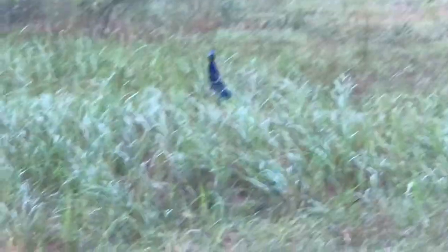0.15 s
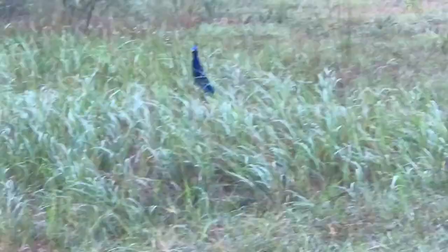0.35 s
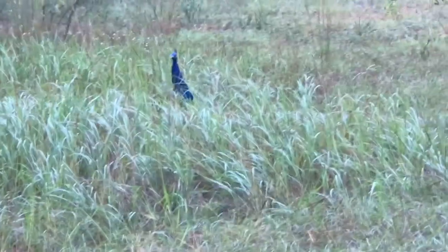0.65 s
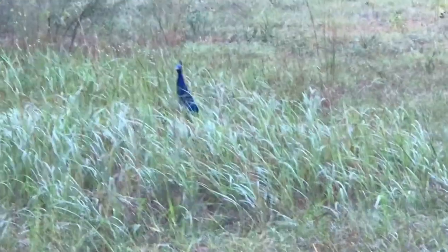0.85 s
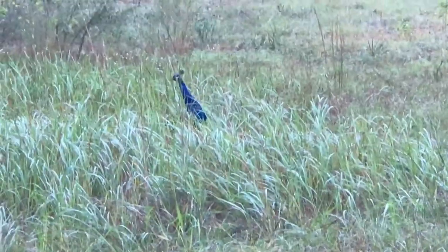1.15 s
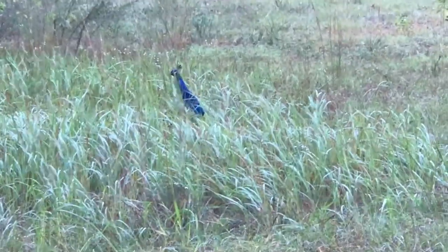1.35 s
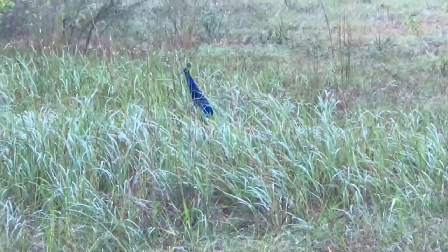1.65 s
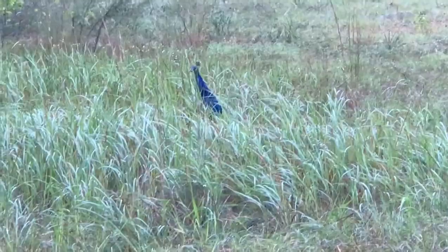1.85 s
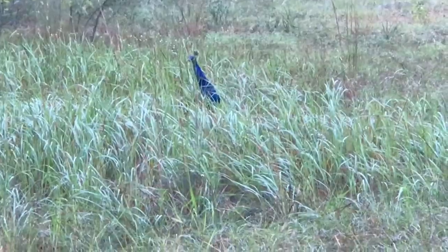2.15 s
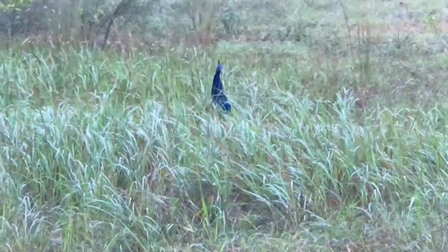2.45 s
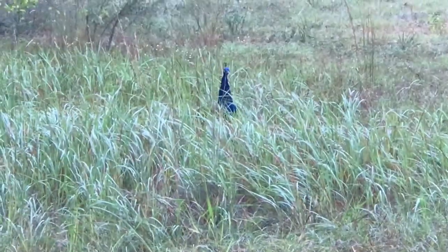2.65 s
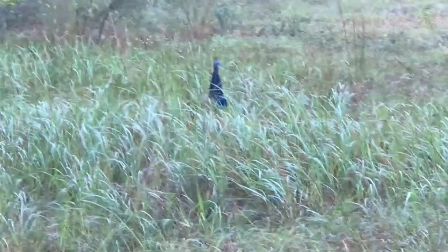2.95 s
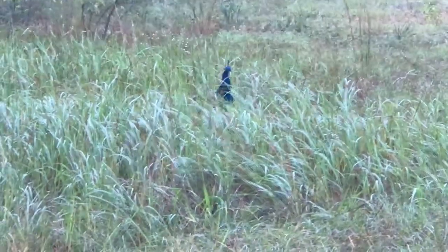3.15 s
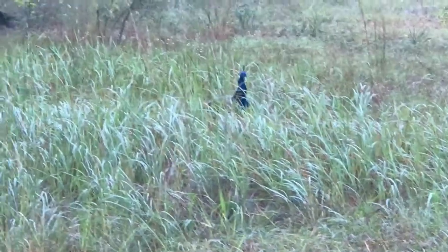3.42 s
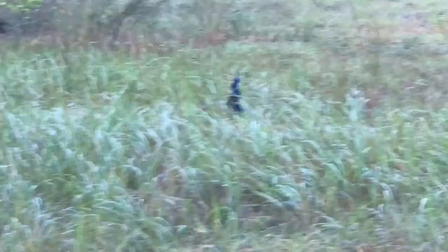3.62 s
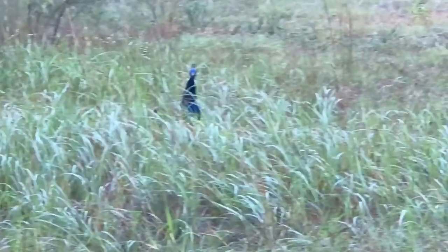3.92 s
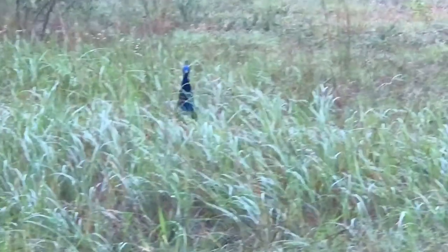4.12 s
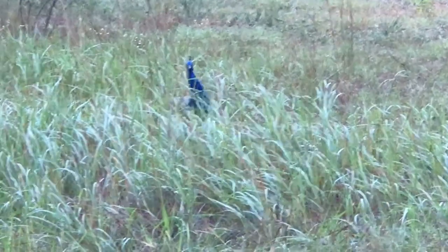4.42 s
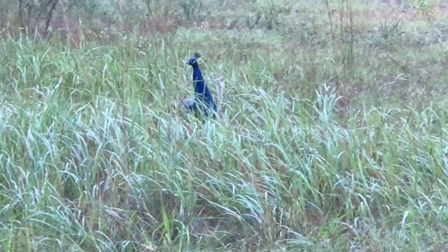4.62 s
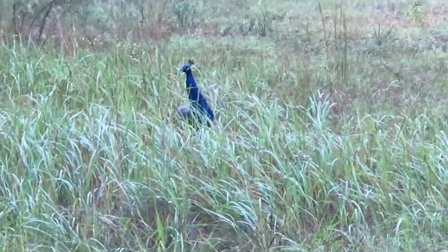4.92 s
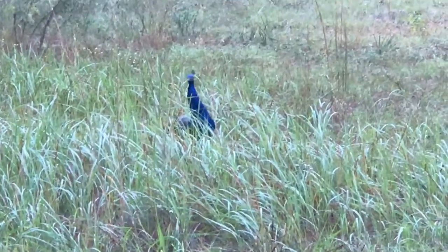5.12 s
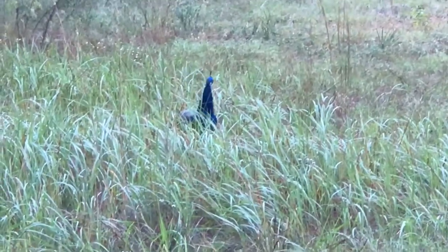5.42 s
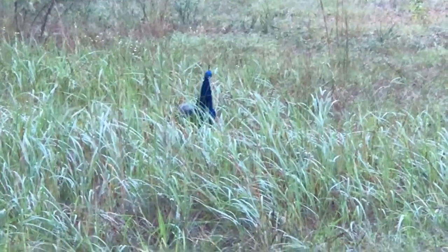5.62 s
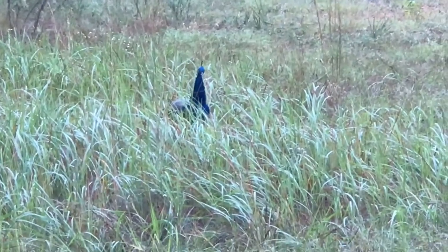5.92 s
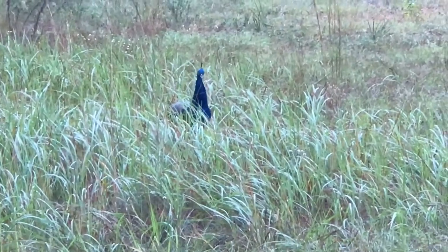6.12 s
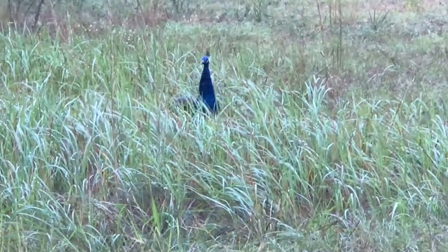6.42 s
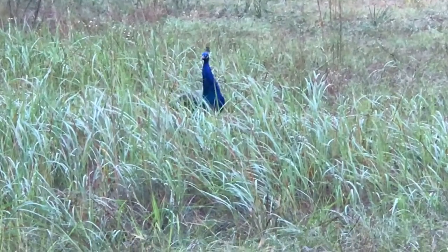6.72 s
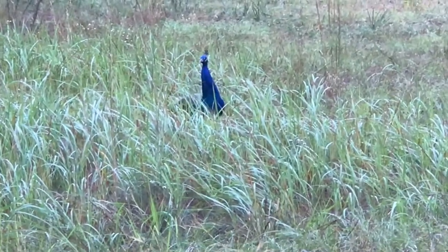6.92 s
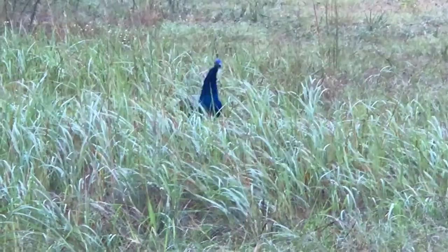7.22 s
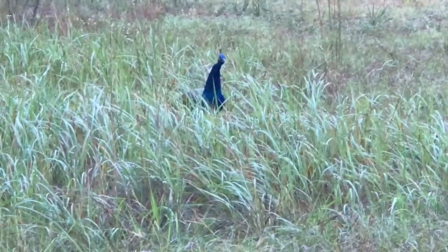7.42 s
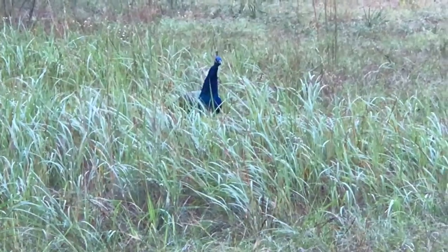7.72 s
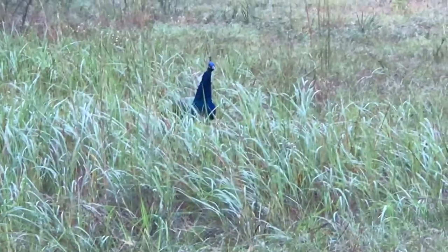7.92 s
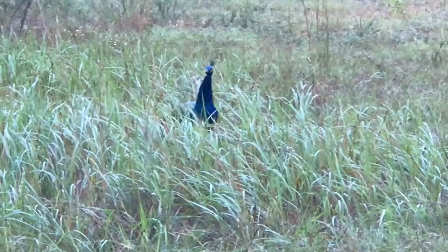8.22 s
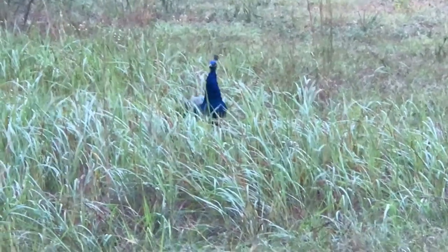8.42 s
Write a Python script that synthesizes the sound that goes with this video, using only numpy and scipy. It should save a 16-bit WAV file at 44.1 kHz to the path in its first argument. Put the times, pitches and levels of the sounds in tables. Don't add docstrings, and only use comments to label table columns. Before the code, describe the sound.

Outdoors in a grassy field, the last echo of a honk fades among trees. A cricket trills about once a second while distant birds screech, whistle and chirp. Dry stems tick and leaves swish close by, over microphone hiss and a low engine drone. Near the end a peacock gives one short, blaring honk, overloading the small microphone, and its echo rings away.

```python
import sys
import numpy as np
from scipy import signal
from scipy.io import wavfile
from scipy.ndimage import uniform_filter1d

SR = 44100
rng = np.random.default_rng(int(sys.argv[2]) if len(sys.argv) > 2 else 0)


def to_wav(s):
    ch = np.atleast_2d(s).T
    pcm = np.round(np.clip(ch, -1, 1) * 32767)
    wavfile.write(sys.argv[1], SR, pcm.astype(np.int16))


def ratio(d):
    e = np.asarray(d, float) / 20
    return 10 ** e


N = 377496


def evened(x):
    return x / np.sqrt(np.mean(x ** 2) + 1e-20)


def read(points, hz):
    f, value = np.transpose(points)
    return np.interp(np.log(hz + 1), np.log(f + 1), value)


def add(mix, s, sound):
    part = mix[round(s * SR):][:len(sound)]
    part += sound[:len(part)]


def samples_of(length_s):
    return np.arange(round(length_s * SR)) / (length_s * SR)


def sine(turns):
    return np.sin(2 * np.pi * turns)


def spread(rows):
    s, *columns = np.transpose(rows)
    t = np.arange(s[0], s[-1], 1 / SR)
    return s[0], [np.interp(t, s, column) for column in columns]


def swells(rows, taper):
    out = np.zeros(N)
    for s, length, db in rows:
        add(out, s, ratio(db) * signal.windows.tukey(round(length * SR), np.clip(taper, 0, 1)))
    return out


def chance(size):
    return rng.standard_normal(-(-size // 32768) * 32768)[:size]


def wobble(size, hz):
    span = max(int(SR / hz), 1)
    smooth = uniform_filter1d(chance(size), span)
    return evened(uniform_filter1d(smooth, span))


def resonate(x, hz, width):
    turn = np.exp(2j * np.pi * np.cumsum(hz * np.ones(len(x))) / SR)
    r = np.exp(-np.pi * width / SR)
    smooth = signal.lfilter([(1 - r) ** 2], [1, -2 * r, r * r], x / turn + 1e-18)
    return 2 * (turn * smooth).real


def causal_phase(db):
    mirrored = np.r_[db, db[-2:0:-1]]
    return -signal.hilbert(np.log(ratio(mirrored))).imag[:len(db)]


def hiss(spectrum, patchy_db, size=N, order=10):
    frame = 2 ** order
    frames = (size // 32768 + 1) * 32768 * 4 // frame + 5
    hz = np.fft.rfftfreq(frame, 1 / SR)
    a, b, patches = rng.standard_normal((frames, len(hz), 3)).T
    patches = uniform_filter1d(patches, size=12, axis=0)
    patches = evened(uniform_filter1d(patches, size=14, axis=1))
    z = (a + 1j * b) * ratio(read(spectrum, hz)[:, None] + patchy_db * patches)
    return evened(signal.istft(z, nperseg=frame, noverlap=frame * 3 // 4)[1][:size])


def tail(t60s, gap_s, colour=((1, 0), (2, 0)), clumps_db=0):
    taps = np.zeros(2 * SR)
    at = np.arange(0, 2 * SR - 20, 20) + rng.integers(0, 20, SR // 10 - 1)
    taps[at] = rng.choice([-1., 1.], at.shape) * (at > gap_s * SR)
    hz, t, z = signal.stft(taps, SR, nperseg=256)
    gain_db = read(colour, hz)[:, None] - 60 * t / read(t60s, hz)[:, None]
    clumps = uniform_filter1d(rng.standard_normal(z.shape), size=5, axis=0)
    clumps = evened(uniform_filter1d(clumps, size=14, axis=1))
    out = signal.istft(z * ratio(gain_db + clumps_db * clumps), SR, nperseg=256)[1]
    return out / np.linalg.norm(out)


# pitch in Hz, level in dB.
MIC_COLOUR = [(22, -42), (76, -22), (130, -0.5), (425, -9.5), (800, -15), (1500, -17.5), (2500, -22),
              (5000, -24), (6300, -24), (8000, -27.5), (10500, -29.5), (12500, -26), (15800, -28.5)]
DRONE_COLOUR = [(60, -22.5), (80, 0), (95, 7), (108, 0.5), (125, -20), (200, -11.5), (260, -29),
                (400, -44.5)]
RUMBLE_COLOUR = [(15, -56), (25, -10), (37, -10), (54, 6), (97, -10), (119, -26), (140, -4), (180, -36),
                 (310, -120)]
CHATTER_COLOUR = [(250, -39), (500, -3), (1000, -2.5), (2200, 1.5), (3500, -2), (4500, -8), (6000, -30.5),
                  (12000, -22)]
LEAF_COLOUR = [(400, -4), (800, 8), (4000, -7), (8000, -4.5), (13000, -8), (15800, -27)]
# time in seconds, level in dB.
DRONE_LEVEL = [
    (0, -52.5),
    (1.0, -49.5),
    (2.7, -53),
    (3.8, -57),
    (6.6, -58.5),
    (7.15, -53.5),
    (8.2, -54.5),
    (8.56, -62),
]
# start in seconds, length in seconds, level in dB.
FLURRIES = [(0, 0.38, -74), (.35, 0.076, -61), (.47, 0.15, -63), (.88, 0.095, -58.5), (1.0, 0.87, -64.5),
            (1.86, 0.16, -64.5), (2.2, 0.21, -65), (2.5, 0.68, -59.5), (3.19, 0.16, -60), (3.3, 0.56, -66),
            (3.62, 0.035, -59), (3.9, 0.49, -59.5), (4.4, 0.16, -62), (6.27, 0.25, -68), (6.33, 0.064, -68),
            (7.9, 1, -68.5)]
# start in seconds, length in seconds, level in dB.
SWISHES = [
    (.0, 0.067, -57),
    (0.247, 0.061, -58.5),
    (.52, 0.082, -59.5),
    (1.12, 0.06, -57.5),
    (3.383, 0.11, -68),
    (4.152, 0.1, -57.5),
    (7.746, 0.14, -57.5),
    (8.103, 0.075, -57),
]


def background():
    t = np.arange(N) / SR
    drone = ratio(np.interp(t, *np.transpose(DRONE_LEVEL))) * hiss(DRONE_COLOUR, 1.0, order=13)
    drone += ratio(-57.5) * hiss(RUMBLE_COLOUR, 1.2, order=13)
    chatter_gain = (ratio(-67) + swells(FLURRIES, taper=.7)) * ratio(1.8 * wobble(N, hz=16))
    leaves = swells(SWISHES, taper=0.32) * hiss(LEAF_COLOUR, 4.3)
    mic = ratio(-56.05) * hiss(MIC_COLOUR, 0.91)
    chatter = chatter_gain * hiss(CHATTER_COLOUR, 2.3)
    return mic + drone + chatter + leaves


# start in seconds, pitch in Hz, peak level in dB.
THUDS = [
    (.162, 754, -43),
    (3.468, 412, -38),
    (3.601, 400, -43),
    (4.225, 900, -44),
    (4.265, 890, -45),
]


def thuds():
    out, t = np.zeros(N), np.arange(SR // 20) / SR
    for s, hz, db in THUDS:
        add(out, s, ratio(db - 60 * t / .03) * sine(hz * t * (1 - 8 * t)))
    return out


# start in seconds, peak dB above 7 kHz, dB at 3-7 kHz, dB below 3 kHz.
TICKS = [(0.162, -41, -67, -44), (0.9109, -54, -60, -50), (0.9494, -57, -67, -68), (1.235, -44, -60, -65),
         (1.2725, -33, -44.5, -44), (1.484, -43, -57, -71), (1.601, -40, -50, -58), (1.775, -48, -60, -63),
         (1.793, -36, -51, -57), (1.928, -51, -51, -65), (1.982, -43, -61, -60), (2.1502, -36, -52, -58),
         (2.22, -55, -60, -56), (3.2389, -44, -62, -69), (3.291, -37, -45.5, -48), (3.385, -43, -63, -68),
         (3.4014, -37, -49, -50.5), (3.6867, -39.5, -60, -58), (3.853, -39, -50, -58),
         (4.6395, -32, -57, -55), (4.809, -30.5, -50.5, -64), (5.368, -54, -53, -55),
         (6.652, -54, -53, -59), (7.113, -39, -52, -57)]
# start in seconds, peak level in dB.
KNOCK = [
    (3.918, -30),
]
# pitch in Hz, level in dB.
KNOCK_COLOUR = [(35, -30), (60, 17), (224, -10.5), (875, -11.5), (1630, -11.5), (2110, 1), (2530, -8.5),
                (3580, -5.5), (5060, -19), (15000, -44)]


def ticks():
    out, t = np.zeros(N), np.arange(800) / SR
    edges = (7000, 15500), (3000, 7000), (500, 3000)
    bands = [signal.butter(2, edge, "bandpass", fs=SR, output="sos") for edge in edges]
    lifts_db = -.5, 7., 10.
    for s, *dbs in TICKS:
        fade = ratio(-60 * t / 0.004) + 0.4 * ratio(-60 * t / 0.04)
        snap = rng.standard_normal(len(t)) * fade
        snap[0] = 3.5
        parts = [(-1) ** k * signal.sosfilt(band, snap) for k, band in enumerate(bands)]
        for db, lift, part in zip(dbs, lifts_db, parts):
            add(out, s, ratio(db + lift) * part / abs(part).max())
    t = np.arange(SR // 2) / SR
    s, db = KNOCK[0]
    ring = 0.59 * ratio(-60 * t / 0.022) + ratio(-60 * t / 0.18) + 0.68 * ratio(-60 * t / .5)
    noise = hiss(KNOCK_COLOUR, 2.3, len(t), order=8)
    add(out, s, ratio(db - 11.0) * noise * np.minimum(t / .0015, 1) * ring)
    return out


# start in seconds, length in seconds, pitch in Hz, width in Hz, level in dB.
CROWD = (6.5, 1.95, 1330, 420, -63.5)


def crowd():
    s, length, hz, width, db = CROWD
    band = evened(resonate(chance(round(length * SR)), hz, width))
    level = ratio(db + 2.2 * wobble(len(band), hz=6.5))
    return s, band * level * signal.windows.tukey(len(band), .15)


# multiple of that pitch, width in Hz, level in dB.
LOWER_BANDS = [(.45, 150, -14), (.76, 60, -12), (.93, 60, -5), (1, 50, -2), (1, 300, -5), (1.36, 90, -11)]
UPPER_BANDS = [(.85, 130, -8), (.95, 160, -6), (1.005, 110, -4), (1, 600, -1.5), (2.03, 900, -9),
               (3, 2500, -13)]
# pitch in Hz, level in dB.
BREATH_COLOUR = [(600, -42), (1000, -10), (1700, -8), (2400, 0.5), (3200, -1), (4500, -4.5), (5200, -6.5),
                 (8000, -19.5), (15000, -22)]


def screech(s, length, effort_db, hz, glide):
    t = np.arange(round(length * SR)) / SR
    weakness_db = min(effort_db + 50, 0)
    bow = 1 + .06 * length * np.sin(np.pi * t / length)
    scoop = 0.236 * np.exp(-t / 0.031)
    low_hz = hz * (bow - scoop) + .3 * glide * (t - length / 2)
    high_hz = (4456 + 15 * weakness_db) * bow + glide * (t - length / 2)
    rise_s, fall_s = .08, .15
    edge = np.maximum(np.maximum(1 - t / rise_s, 1 - (length - t) / fall_s), 0)
    clarity_db = .7 * weakness_db - 7
    shake = 1 + .011 * wobble(len(t), hz=20)
    flutter = ratio(0.43 * wobble(len(t), hz=302))
    voice = ratio(-5) * hiss(BREATH_COLOUR, 2.5, len(t))
    for centre_hz, bands in ((low_hz, LOWER_BANDS), (high_hz, UPPER_BANDS)):
        for k, width, db in bands:
            flicker = ratio(1.4 * wobble(len(t), hz=14))
            band = evened(resonate(chance(len(t)), k * centre_hz * shake, width))
            voice = voice + ratio(db + clarity_db) * flicker * band
    level_db = effort_db - 2.0 - 11 * edge - 3 * t / length
    return s, ratio(level_db) * evened(flutter * voice) * signal.windows.tukey(len(t), .12)


def whistle(s, length, start_hz, end_hz, top_db, shake=.012):
    u = samples_of(length)
    glide = np.sin(np.pi / 2 * np.minimum(u / .8, 1) ** 1.15) ** 2
    hz = start_hz + (end_hz - start_hz) * glide
    db = top_db - 2.8 * (hz.max() - hz) / 1000
    hz = hz * (1 + shake * wobble(len(hz), hz=103))
    level = ratio(db - 1.2 + 3.5 * wobble(len(hz), hz=70))
    return s, level * sine(np.cumsum(hz) / SR) * signal.windows.tukey(len(hz), .3)


def note(s, length, hz, db, favoured):
    u = samples_of(length)
    turns = np.cumsum(hz + 18 * wobble(len(u), hz=300)) / SR
    tone = sum(ratio(db + 3.5 - 14 * abs(k - favoured)) * sine(k * turns) for k in (1, 2, 3))
    return s, tone * ratio(4 * wobble(len(u), hz=120) - 6 * u) * signal.windows.tukey(len(u), .3)


# start in seconds, length in seconds, effort in dB, pitch in Hz, upper glide in Hz per s.
SCREECHES = [
    (1.09, .37, -48.5, 2000, -1300),
    (1.34, .26, -49, 2230, -2800),
    (2.62, .53, -48.5, 2150, 300),
    (4.44, .37, -56, 2400, -700),
    (5.61, .59, -47, 2230, -100),
    (8.07, .25, -54, 2120, 200),
]
# start in seconds, length in seconds, start Hz, end Hz, dB at the top pitch.
WHISTLES = [(.672, .03, 5550, 3800, -55), (.7, .122, 3600, 5080, -57.5), (.814, .04, 5080, 3400, -57),
            (2.482, .072, 3800, 5700, -61), (4.02, .17, 3500, 5300, -62), (6.405, .042, 5600, 3900, -55),
            (8.41, .035, 5500, 3300, -54), (8.495, .065, 3370, 3470, -59), (4.46, .075, 3000, 2100, -59),
            (4.5, .14, 3980, 3850, -61.5), (4.61, .13, 4520, 4380, -65), (1.385, .1, 2330, 2200, -56),
            (1.39, .16, 4800, 4300, -58), (1.445, .08, 3920, 3700, -62), (6.34, .04, 2400, 3300, -60),
            (1.125, .05, 2080, 1960, -57)]
STREAKS = [(1.198, 0.057, 2040, 2300, -53), (1.1, 0.11, 4700, 4500, -55), (1.856, 0.023, 3550, 4020, -57),
           (1.875, .04, 2300, 2550, -63), (2.275, .025, 2200, 2150, -60), (2.74, 0.086, 2150, 2100, -60),
           (2.85, 0.11, 2250, 2400, -56), (2.95, 0.16, 2250, 2200, -59), (2.842, 0.15, 4800, 4400, -57),
           (3.039, 0.14, 1700, 1760, -61.5), (4.55, 0.067, 3900, 3860, -63), (4.68, .06, 4300, 4330, -66),
           (5.375, 0.15, 3520, 3480, -69), (5.684, 0.124, 2330, 2040, -50.5), (5.68, .1, 3730, 3700, -61),
           (5.93, .11, 4780, 4600, -55), (5.954, .08, 2290, 2340, -69), (6.06, .1, 2400, 2200, -59),
           (6.198, 0.11, 2900, 2780, -67), (5.72, 0.16, 4380, 4380, -66), (1.24, .13, 4520, 4700, -52),
           (1.27, 0.073, 2100, 1880, -61), (8.1, 0.21, 4250, 3900, -66), (8.15, .1, 3870, 3750, -64),
           (6.3, .05, 1650, 2200, -62), (2.65, 0.041, 1600, 2020, -60), (1.1, .035, 1500, 2000, -60),
           (8.17, 0.094, 2050, 1800, -62)]
# start in seconds, length in
# seconds, pitch in Hz, level in dB, favoured multiple.
NOTES = [(0.019, 0.07, 1172, -53, 2.3), (1.111, 0.019, 1010, -52, 1.15), (1.862, 0.045, 1250, -56, 3.0),
         (1.95, .036, 1793, -56.5, 1.5), (2.262, 0.026, 1243, -49.5, 2.6), (2.336, 0.053, 1290, -62, 2.8),
         (2.428, 0.038, 1250, -62.5, 3.0), (2.632, 0.036, 997, -49, 1.4), (3.435, 0.042, 1750, -56, 1.25),
         (3.605, 0.045, 1143, -56, 1.8), (4.006, 0.045, 1200, -56, 2.1), (4.03, 0.054, 1405, -56, 2.05),
         (5.375, 0.031, 1068, -53, 2.05), (5.36, 0.062, 2300, -58.5, .95), (5.363, 0.057, 3490, -58.5, .95),
         (5.618, 0.043, 1012, -52.5, 1.15), (6.15, 0.12, 1350, -58.5, 1.5), (6.344, 0.025, 1240, -58, 2.05),
         (6.538, 0.12, 1196, -55.5, .9), (7.038, 0.13, 1282, -60, .9), (8.05, 0.13, 1235, -54.5, 2.8),
         (8.087, 0.11, 1314, -56, .95), (5.62, 0.035, 1570, -59, .95), (7.731, 0.039, 1190, -55, 2.05),
         (2.648, .02, 1590, -62, .95), (2.828, 0.028, 960, -62, .95)]
# pitch in Hz, seconds to fade by 60 dB.
GROVE = [(500, 0.27), (3000, 1), (10000, 0.13)]


def birds():
    sounds = [screech(*row) for row in SCREECHES]
    sounds += [whistle(*row) for row in WHISTLES]
    sounds += [whistle(*row, shake=.005) for row in STREAKS]
    sounds += [note(*row) for row in NOTES]
    sounds.append(crowd())
    out = np.zeros(N)
    for sound in sounds:
        add(out, *sound)
    return out + ratio(-10.5) * signal.fftconvolve(out, tail(GROVE, .015))[:N]


# spacing in seconds, length in seconds, start Hz, end Hz, octave level in dB.
CHIRP = (.0292, .0122, 6350, 5620, -8)
# first chirp in seconds, last chirp in seconds, level in dB.
TRILLS = [
    (.3745, .6958, -56),
    (1.452, 1.8337, -56),
    (2.539, 2.8913, -56),
    (3.5528, 3.9035, -56),
    (4.5705, 4.9492, -56),
    (5.587, 5.995, -55.5),
    (6.8214, 7.229, -57),
    (7.925, 8.3908, -56),
]
# start in seconds, length in seconds, level in dB.
FAR_CRICKETS = [
    (.35, 1.82, -71.5),
    (2.6, .75, -70),
    (4.18, 0.7, -70.5),
    (5.4, 0.61, -69),
    (6.42, 2.15, -71),
]


def cricket():
    spacing, length, start_hz, end_hz, octave_db = CHIRP
    u = samples_of(length)
    fall = np.sin(np.pi / 2 * np.clip(1.8 * u - .35, 0, 1)) ** 2
    turns = np.cumsum(start_hz + (end_hz - start_hz) * fall) / SR
    octave = ratio(octave_db) * 2 * (1 - u) ** 2 * sine(2 * turns)
    chirp = np.sin(np.pi * u) ** 0.4 * (sine(turns) + octave)
    out = np.zeros(N)
    for first, last, db in TRILLS:
        times = np.linspace(first, last, round((last - first) / spacing) + 1)
        uneven_db = .7 * rng.standard_normal(20)
        for k, s in enumerate(times):
            weak_start_db = -2.9 * (k == 0)
            add(out, s - .001, ratio(db + 2.1 + uneven_db[k] + weak_start_db) * chirp)
    far = evened(resonate(rng.standard_normal(N), 5480, width=480))
    far *= ratio(3 * np.cos(2 * np.pi * (np.arange(N) / SR - 1.912) / .0308))
    far_gain = ratio(-81.5) + swells(FAR_CRICKETS, taper=0.057)
    return out + far * far_gain * ratio(0.39 * wobble(N, hz=1.1))


# time in seconds, effort in dB, pitch in Hz.
HONK = [
    (7.2305, -21, 178),
    (7.25, -20, 181.5),
    (7.27, -21.5, 197.5),
    (7.28, -14.5, 202.3),
    (7.305, -12, 204.2),
    (7.335, -11.8, 206.9),
    (7.385, -12.6, 206.5),
    (7.418, -18.5, 203.4),
    (7.445, -38, 203),
]
# multiple of the pitch, level in dB.
OPEN_ORDERS = [(1, -9.5), (2, -38), (3, -26.5), (4, -21.5), (5, -8.5), (6, -13.5), (7, -4), (8, -10),
               (9, -6.5), (10, -12.5), (11, -15), (12, -16.5), (13, -16), (14, -6.5), (15, -6.5), (16, 1),
               (17, -3.5), (18, -5.5), (19, -9.5), (20, -6.5), (21, -15), (22, -10), (23, -25.5),
               (24, -17.5), (25, -17), (26, -11), (27, -11), (28, -11.5), (29, -8), (30, -8), (31, -14),
               (32, -11.5), (33, -17), (34, -12), (35, -13.5), (36, -14), (37, -21), (38, -16), (39, -14),
               (40, -16.5), (41, -17.5), (42, -21), (43, -15.5), (44, -17), (45, -19.5)]
SHUT_ORDERS = [(1, -6.5), (2, -27.5), (3, -18), (4, -18), (5, -9.5), (6, -2.5), (7, -7), (8, 1), (9, -0.5),
               (10, -11), (11, -3), (12, -10), (13, -18), (14, -12), (15, -28), (16, -2.5), (17, -10),
               (18, 1.5), (19, -5), (20, -2), (21, 2), (22, -9), (23, -4), (24, -12)]
# pitch in Hz, level in dB.
BRASS = [(9360, -4.5), (10500, -16), (10700, -7.5), (12200, -7.5), (15800, -13.5)]


def honk():
    s, (effort_db, hz) = spread(HONK)
    since = np.arange(len(hz)) / SR
    t = s + since
    opened = np.clip((t - 7.264) / 0.045, 0, 1)
    beak = opened * np.clip((7.428 - t) / 0.044, 0, 1)
    turns = .43 + np.cumsum(hz * (1 + 0.0029 * wobble(len(hz), hz=148))) / SR
    k = np.arange(1, 77)
    rows = k[:, None]
    brass_db = read(BRASS, 206 * k) - 11 + 2.2 * rng.standard_normal(len(k))
    open_db = np.r_[np.transpose(OPEN_ORDERS)[1], brass_db[len(OPEN_ORDERS):]]
    shut_db = np.r_[np.transpose(SHUT_ORDERS)[1], open_db[len(SHUT_ORDERS):] - 1.5]
    low = hz.mean() * k < 2400
    phase = causal_phase(np.pad(open_db, (1, 30), constant_values=-40))[k]
    phase = phase - 2 * np.pi * k * 0.48 * low
    phase = phase + np.where(low, -1.2, 1.2)
    drift_db = (1.1 + .03 * rows) * np.array([wobble(len(hz), hz=40) for _ in k])
    muffled_db = np.interp(rows * hz / 180.5, k, shut_db)
    muffled_db += 12 * (1 - opened) * np.exp(-((rows * hz - 7900) / 800) ** 2)
    muffled_db -= 0.4 * rows * np.exp(-since / 0.023)
    sharpness_db = 0.0048 * rows * (effort_db - effort_db.max())
    sharpness_db -= 25 * (t - 7.33) * np.clip(rows / 24 - .5, 0, 1)
    gains = ratio(beak * open_db[:, None] + (1 - beak) * muffled_db + drift_db + sharpness_db)
    voice = evened((gains * np.cos(2 * np.pi * rows * turns + phase[:, None])).sum(0))
    air_db = uniform_filter1d(open_db, size=8) + 0.25 * k
    puffs = 0.49 + np.exp(-(turns % 1) / 0.19)
    air = hiss(list(zip(206 * k, air_db)), 0, len(hz)) * puffs
    voice = voice + ratio(-16.7 - 1.2 * beak) * evened(air)
    lead_db = -16 * np.clip((.0062 - since) / .001 + .5, 0, 1)
    return s, ratio(effort_db + lead_db) * voice * signal.windows.tukey(len(hz), .01)


# pitch in Hz, level in dB.
SIDEWAYS = [(150, 12), (900, -0.5), (1440, -6), (1900, -4), (2500, 9.5), (2950, -3), (3300, -6), (3600, -4),
            (4150, 1.5), (4600, 4), (5100, 2.5), (6000, 4), (9000, 8), (16000, 3.5)]
# pitch in Hz, seconds to fade by 60 dB.
FIELD = [(200, 0.22), (1000, 2.5), (2500, 1.92), (4000, 1.27), (6000, 0.88), (12000, 0.52)]
# delay in seconds, level in dB.
ECHOES = [
    (0.076, -18),
    (.17, -28),
    (.41, -41),
]
# pitch in Hz, width in Hz, level in dB.
ECHO_BANDS = [(1440, 590, -2), (3280, 740, -6.5)]
# seconds before the main one, level in dB.
EARLIER_HONK = (7.9, -3.6)


def peacock():
    dry = np.zeros(N)
    add(dry, *honk())
    grass = [(200, 0.044), (3000, 0.49), (12000, 0.16)]  # Hz, seconds to fade by 60 dB
    near = ratio(-11.5) * signal.fftconvolve(dry, tail(grass, 0.0038, SIDEWAYS))[:N]
    far = ratio(-20.5) * signal.fftconvolve(dry, tail(FIELD, 0.036, SIDEWAYS, clumps_db=2.2))[:N]
    thrown = sum(ratio(db) * resonate(dry, hz, width) for hz, width, db in ECHO_BANDS)
    for delay_s, db in ECHOES:
        add(far, delay_s, ratio(db) * thrown[:N - round(delay_s * SR)])
    lead_s, db = EARLIER_HONK
    earlier = far[round(lead_s * SR):] * ratio(db)
    fade = signal.windows.tukey(2 * len(earlier), .3)[len(earlier):]
    add(dry, 0, earlier * fade)
    return dry + near + far


def scene():
    return (peacock() + cricket() + birds() + ticks() + thuds() + background())[None]


def top_cut(x):
    return signal.sosfilt(signal.butter(12, 15930, fs=SR, output="sos"), x)


def record(dry):
    mix = np.clip(dry, -1, 1)
    return top_cut(mix)


dry = scene()
out = record(dry)
to_wav(out)
```